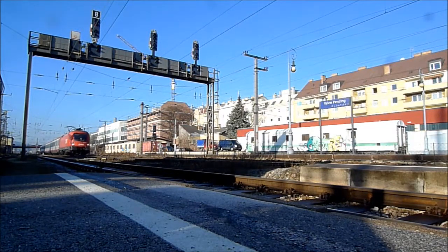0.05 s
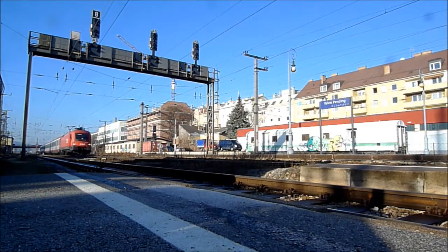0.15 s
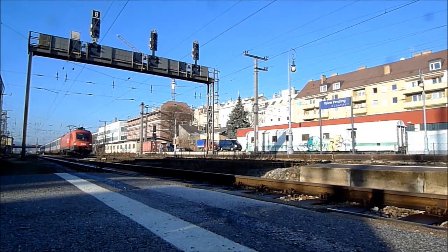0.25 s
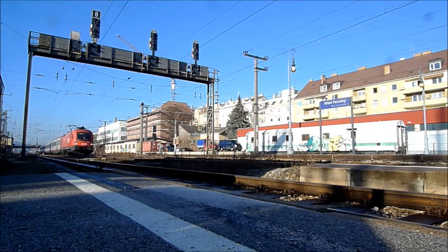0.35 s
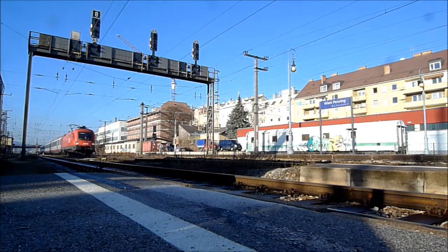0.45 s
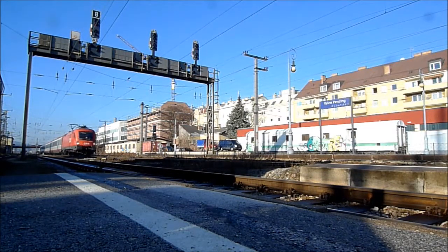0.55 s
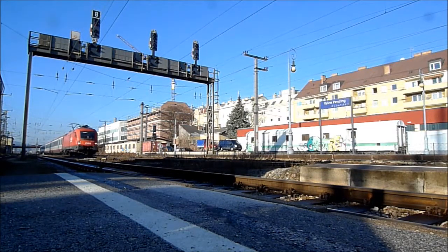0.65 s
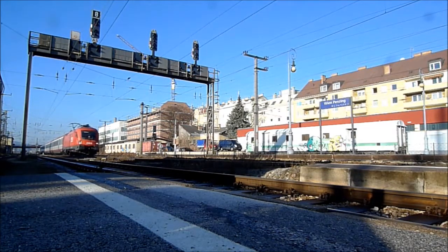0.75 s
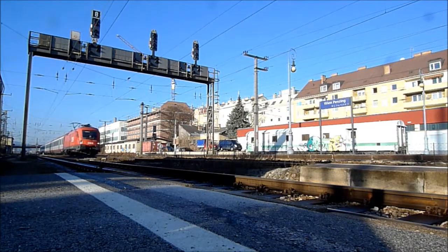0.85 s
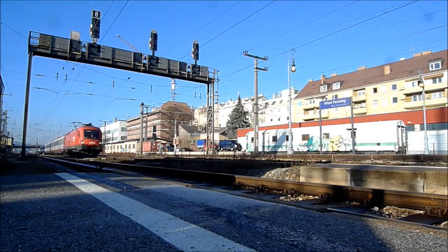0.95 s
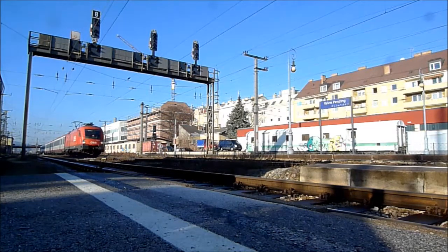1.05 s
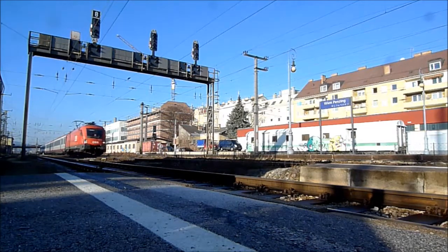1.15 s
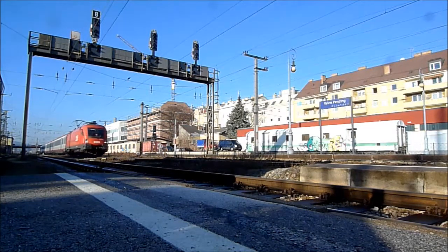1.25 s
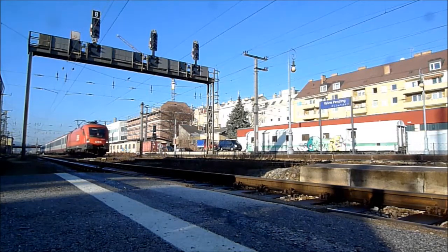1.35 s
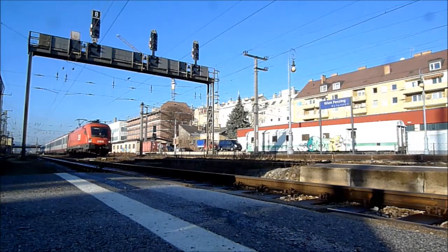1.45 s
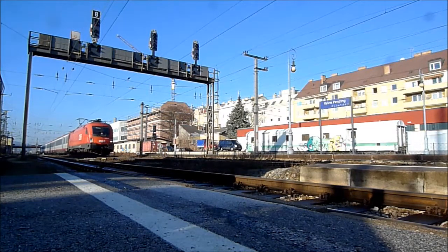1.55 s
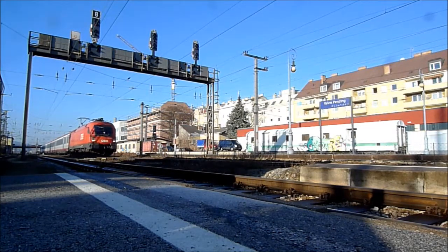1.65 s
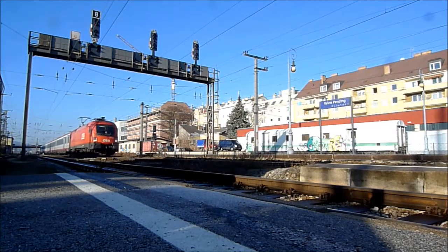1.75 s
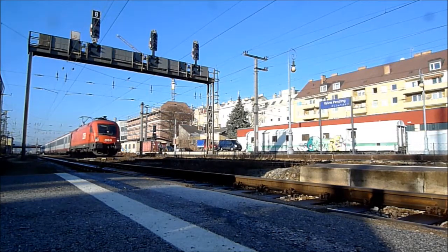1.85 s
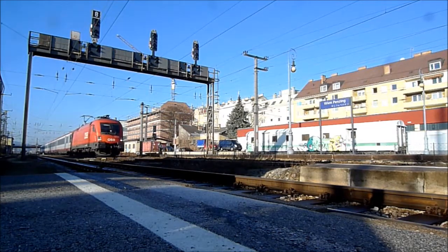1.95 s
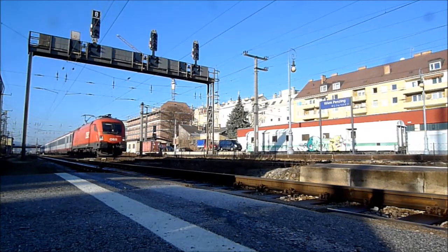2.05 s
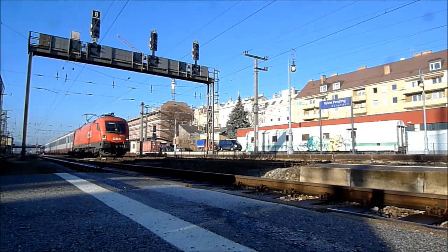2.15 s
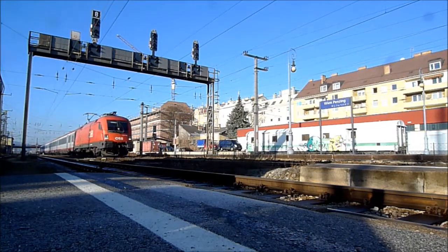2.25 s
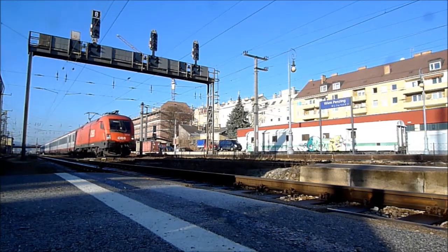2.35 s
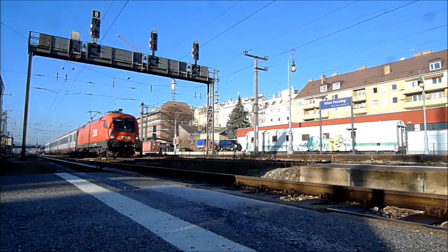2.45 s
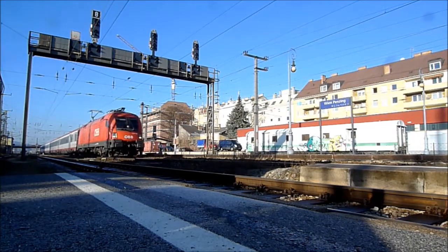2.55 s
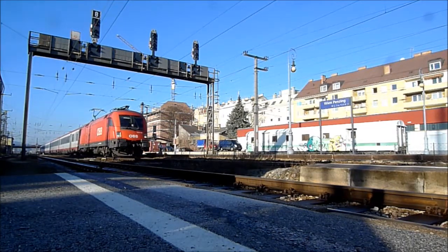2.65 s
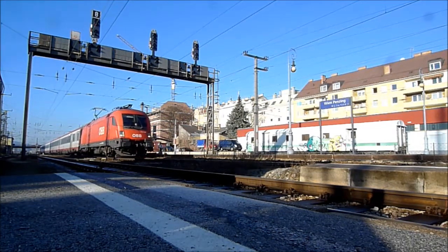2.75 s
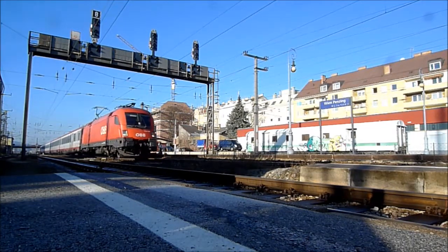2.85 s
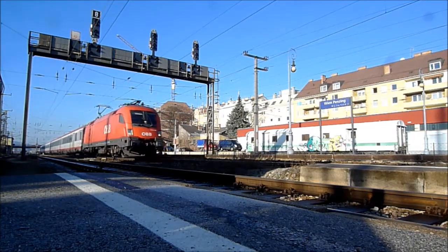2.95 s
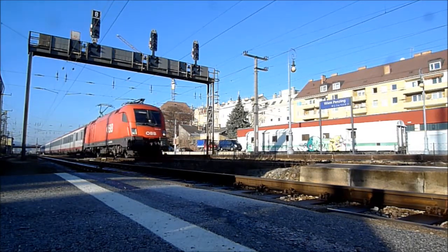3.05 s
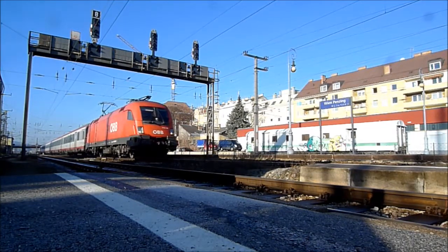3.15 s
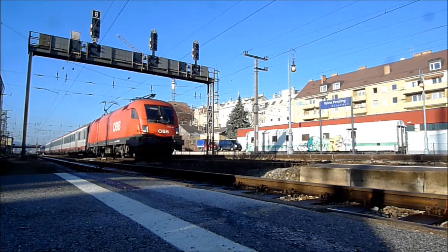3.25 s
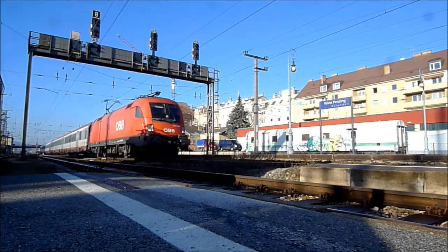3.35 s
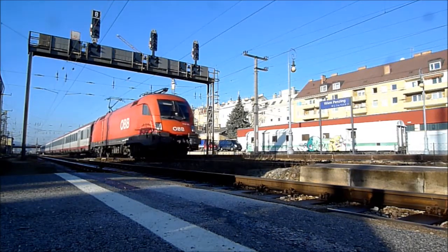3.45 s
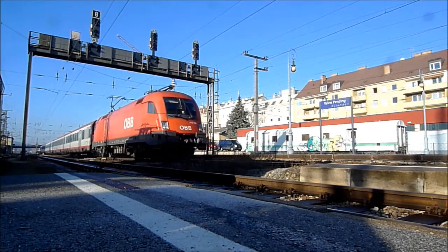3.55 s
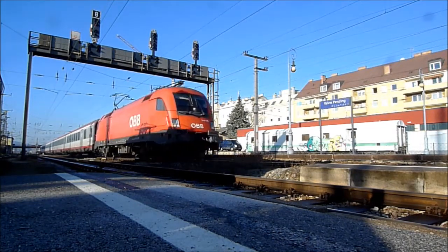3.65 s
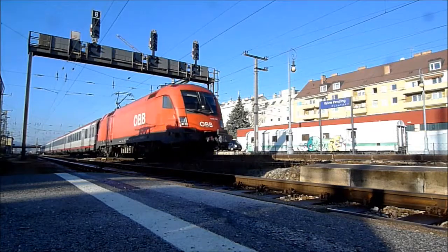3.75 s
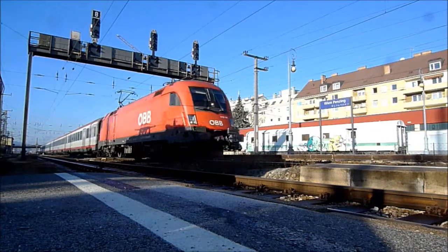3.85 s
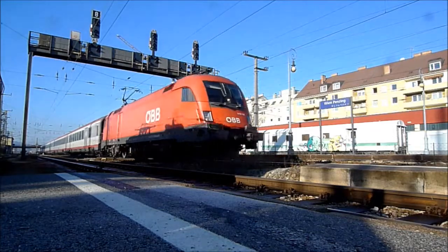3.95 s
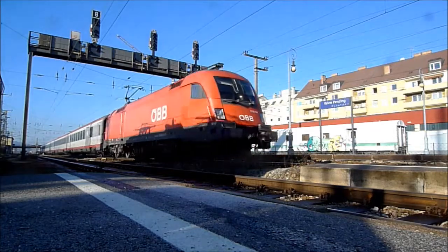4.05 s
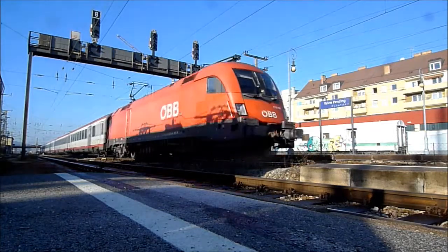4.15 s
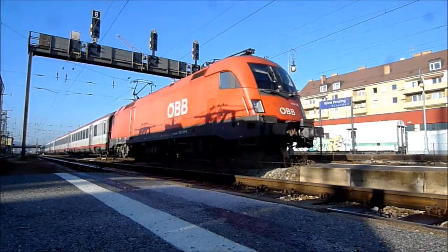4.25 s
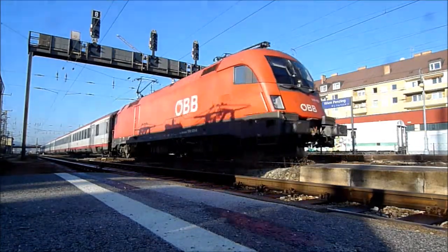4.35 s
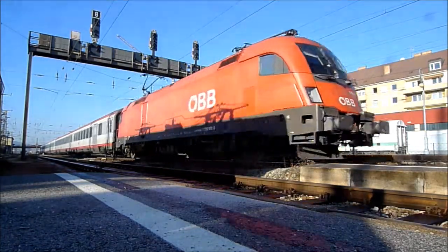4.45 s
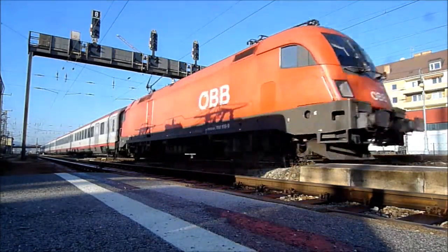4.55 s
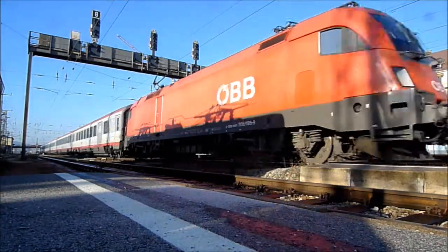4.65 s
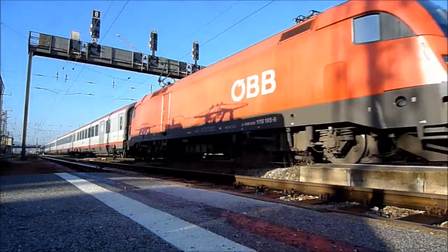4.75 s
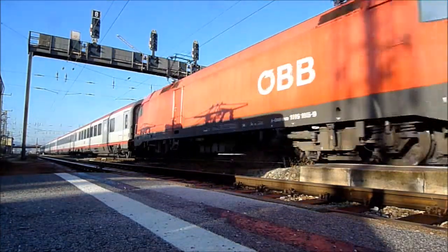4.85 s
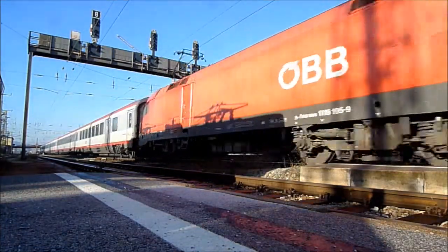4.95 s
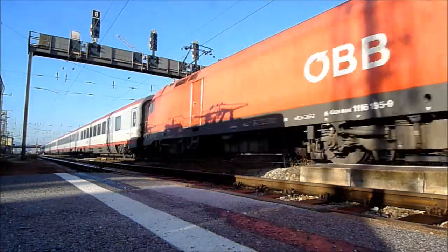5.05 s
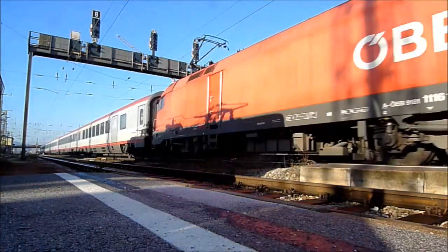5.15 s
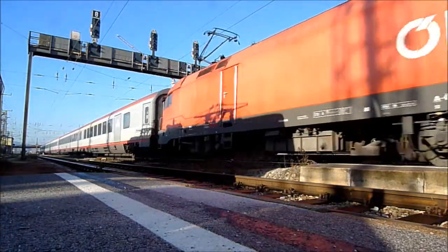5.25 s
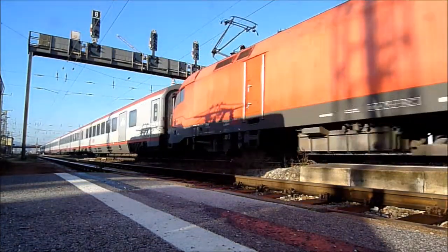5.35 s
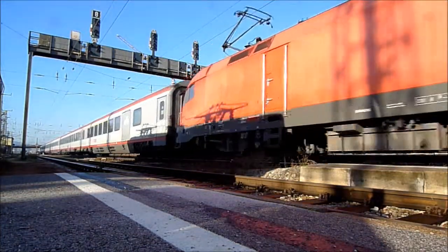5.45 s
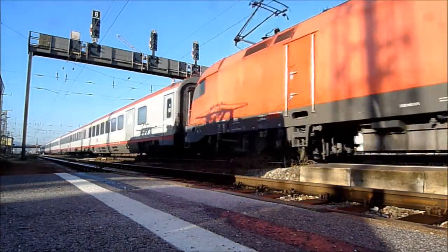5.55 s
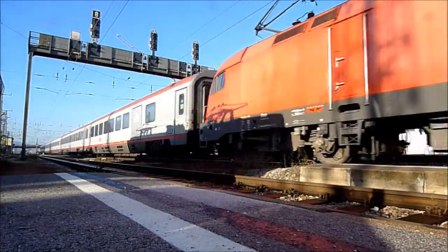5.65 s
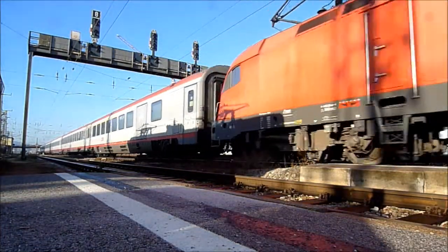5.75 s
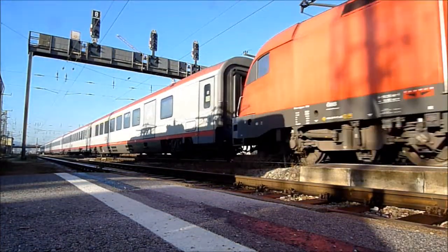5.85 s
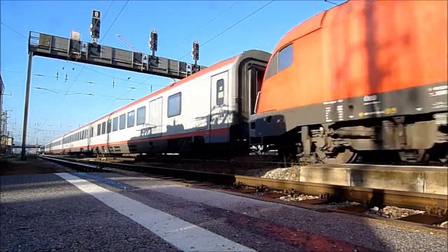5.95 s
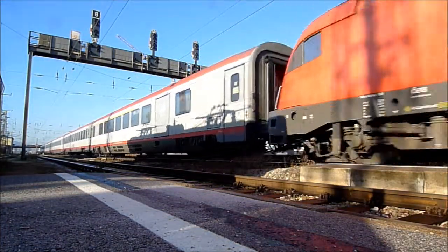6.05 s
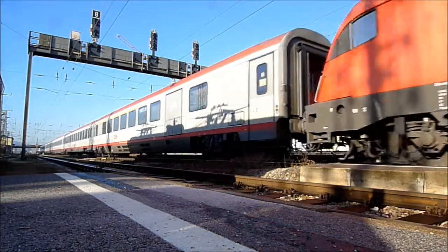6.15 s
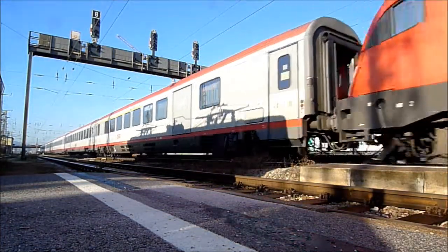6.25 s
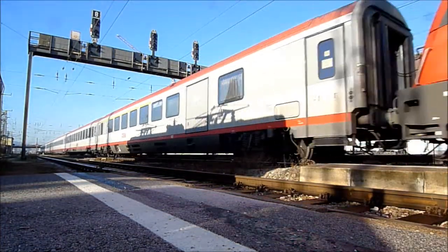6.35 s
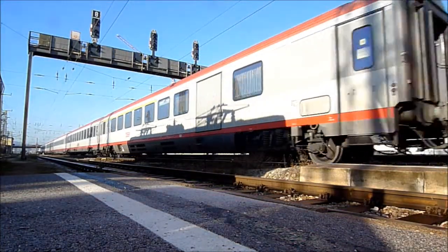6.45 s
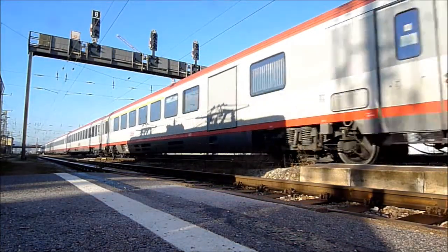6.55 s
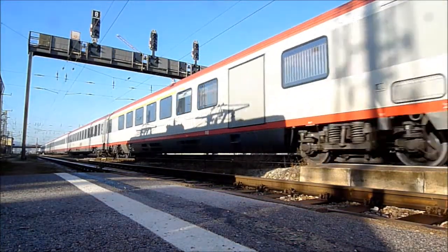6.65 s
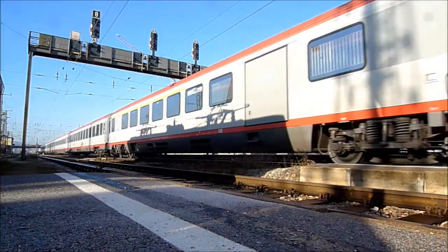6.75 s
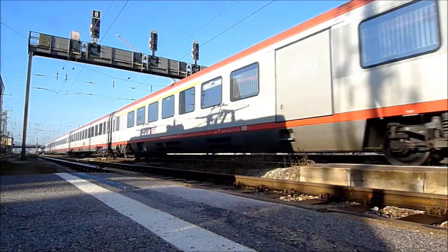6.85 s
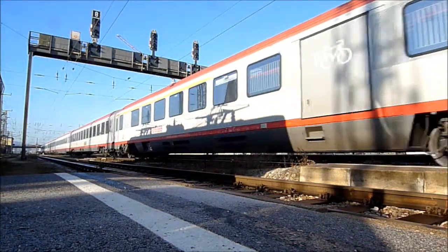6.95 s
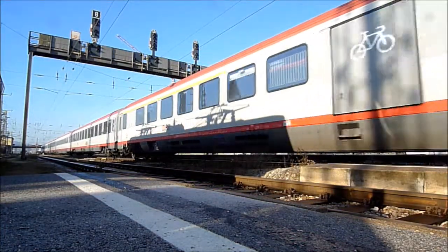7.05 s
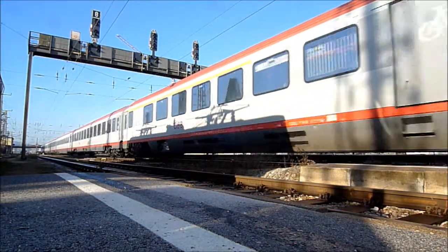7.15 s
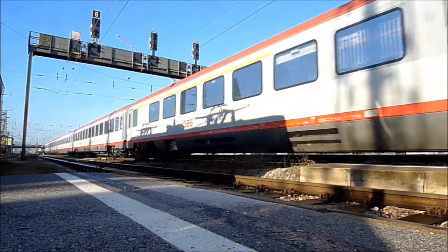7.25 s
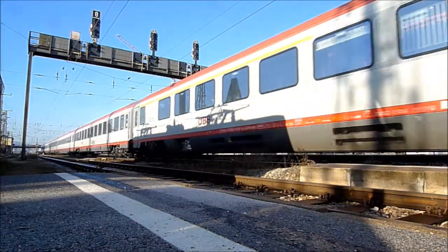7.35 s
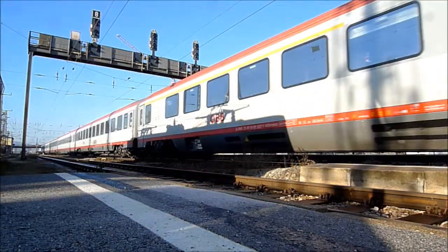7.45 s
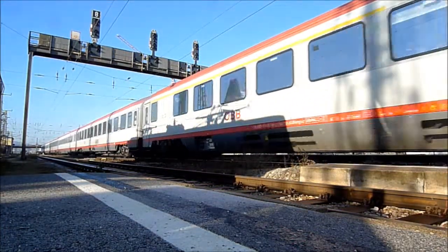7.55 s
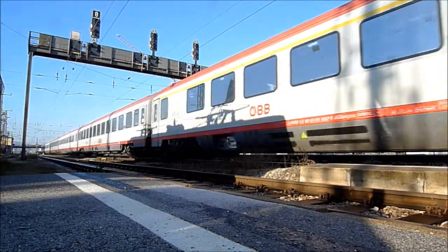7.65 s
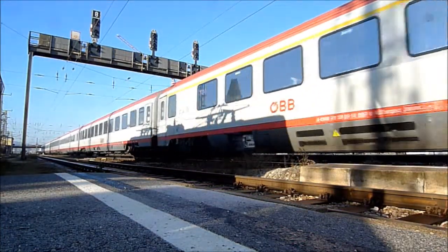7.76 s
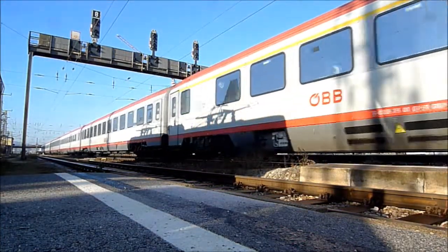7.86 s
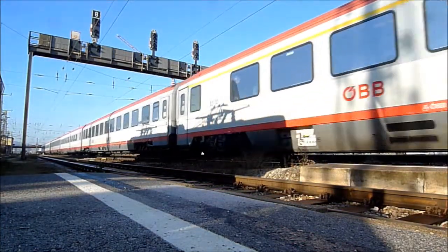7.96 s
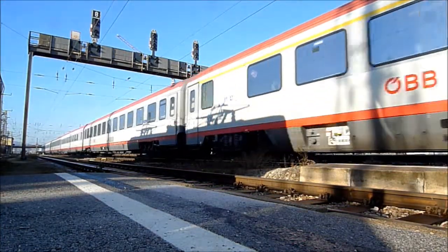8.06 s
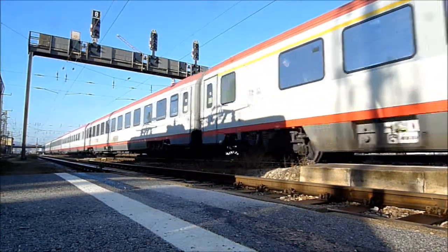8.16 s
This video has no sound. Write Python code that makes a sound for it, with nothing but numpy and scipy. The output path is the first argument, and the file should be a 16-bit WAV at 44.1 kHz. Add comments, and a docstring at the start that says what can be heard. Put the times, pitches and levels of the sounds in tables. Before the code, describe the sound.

Outdoors at a station platform, a fixed microphone close to the track hears a distant rolling rumble with a low electric hum. Small clicks and dull thumps come and go. The locomotive swells into a loud, rough gear whine as it passes, with thin whistles on top. The whine fades, then coaches roll by with ringing wheels and joint thumps, still loud at the end.

```python
"""Rolling noise under a gear whine and a motor hum draws near: an electric locomotive pulls coaches past. The
rolling is one noise in six regions; gears, motors and coach wheels are tones that wander at random. Thin
whistles and lone lines beside the whine's partials are pure tones that switch on and off; wheels thump on rail
joints as damped rings with noise. Small clicks and rattles sound nearby, over a faint hiss and a fainter,
steady high tone."""
import sys
import numpy as np
from scipy import signal
from scipy.fft import rfft, irfft
from scipy.io import wavfile

SR = 44100
rng = np.random.default_rng(int(sys.argv[2]) if len(sys.argv) > 2 else 0)


def gain_from_decibels(decibels):
    """Convert decibel values to linear amplitude factors."""
    exponent = np.asarray(decibels, float) / 20
    return 10 ** exponent


def generate_wav(signal):
    """Clip the signal to [-1, 1] and save it as 16-bit WAV at the path in sys.argv[1]."""
    frames = np.transpose(np.atleast_2d(signal))
    scaled = np.clip(frames, -1, 1) * 32767
    pcm = np.round(scaled).astype(np.int16)
    wavfile.write(sys.argv[1], SR, pcm)


N = 362502
T = np.arange(N) / SR
HZ = np.arange(N // 2 + 1) * SR / N


def in_time(rows):
    """Columns of a curve table at every sample."""
    s, *columns = np.transpose(rows)
    return [np.interp(T, s, c) for c in columns]


def bell(centre_s, length_s):
    """A smooth rise to 1 and fall."""
    return np.exp(-.5 * ((T - centre_s) / length_s) ** 2)


def coloured(points):
    """Spectrum of white noise shaped by (Hz, dB) points."""
    hz, level_db = np.transpose(points)
    shape_db = np.interp(np.log(HZ + 1), np.log(hz), level_db, left=-99, right=-99)
    return rfft(rng.standard_normal(N)) * gain_from_decibels(shape_db)


def band_rms(spectrum, low, high):
    """Rms of the part of a spectrum between two frequencies."""
    inside = spectrum[(HZ > low) & (HZ < high)]
    return np.sqrt(2 * np.sum(np.abs(inside) ** 2)) / N


def drift(rate_hz):
    """Slow chance of spread 1: noise twice through a one-pole low-pass, run in."""
    # worked out at every 32nd sample, then joined up
    r = np.exp(-2 * np.pi * rate_hz * 32 / SR)
    slow = signal.lfilter([1], [1, -2 * r, r * r], rng.standard_normal(N // 32 + 2002))[2000:]
    return np.interp(np.arange(N) / 32, np.arange(len(slow)), slow / slow.std())


def rough_tone(hz, wander_hz, steady):
    """A tone of rms 1: a steady share plus a share whose strength and phase wander."""
    steady = np.clip(steady, 0, 1)
    wander = (drift(wander_hz) + 1j * drift(wander_hz)) * np.sqrt((1 - steady) / 2)
    turning = np.exp(2j * np.pi * np.cumsum(hz * np.ones(N)) / SR)
    return np.sqrt(2) * np.real((np.sqrt(steady) + wander) * turning)


# Rolling noise as the train draws near and its bogies and gaps go by.
# Each row: time in seconds, overall level in dB, brightness in dB per octave.
ROLL_CURVE = [(0.0, -38, 0.5), (0.85, -37.5, 0.5), (1.08, -35.5, -0.5), (2.36, -34.5, 0.0),
              (3.07, -30.5, 0.5), (3.36, -30.5, 0.5), (3.69, -29, 1), (4.51, -23.5, -0.5),
              (4.85, -24, -0.5), (5.54, -24.5, 0), (5.66, -25.5, 1), (6.34, -25, 0), (6.55, -30, 2),
              (6.8, -28, 1), (7.44, -23.5, 0), (7.71, -26, 0), (8.22, -23.5, -0.5)]
# Reference bands of ground, sleepers, car body, rail, wheels and hiss.
# Each row: low edge in Hz, high edge in Hz.
ROLL_BANDS = [(35, 110), (130, 230), (300, 480), (700, 1150), (2300, 3000), (3950, 4500)]
# Spectral shape inside the regions. Each row: frequency in Hz, relative density in dB per Hz.
ROLL_COLOUR = [(13, -27.5), (25, -23.5), (48, -5), (140, 2), (188, 5), (225, 0.5), (330, -6.5), (458, -11),
               (619, -10), (760, -12), (1000, -13), (1840, -12), (2000, -14.5), (2250, -12), (3070, -18.5),
               (3880, -25.5), (4200, -36.5), (5600, -55.5), (7280, -88)]
# How each of those regions moves. Each row: offset from the overall level in dB, share of its swing followed,
# change ahead of the locomotive in dB, change once coaches roll by in dB.
ROLL_REGIONS = [(-12, 0.25, 8.5, -1.5), (-7, 0.27, 1.5, -1.5), (-5.5, 0.79, 3, 1), (-10.5, 0.93, -1, -2.5),
                (-14, 1.33, -2, 0), (-34.5, 0.94, 1.5, 1)]


def rolling():
    """Rough wheels on rough rail: one noise, split in six overlapping regions that swell apart and flutter."""
    noise, out = coloured(ROLL_COLOUR), 0
    centres = np.log([np.sqrt(low * high) for low, high in ROLL_BANDS])
    together = drift(23)
    near_db, bright_db = in_time(ROLL_CURVE)
    mean_db = near_db.mean()
    ahead = bell(3.61, length_s=0.75)
    coaches = np.clip((T - 7.06) / 0.44 + .5, 0, 1)   # change centred on 7.06 s, over 0.44 s
    for k, ((db, follows, ahead_db, coaches_db), (low, high)) in enumerate(zip(ROLL_REGIONS, ROLL_BANDS)):
        # crossfades to its neighbours on a log frequency scale
        region = noise * np.interp(np.log(HZ + 1), centres, np.arange(len(centres)) == k)
        octaves = (centres[k] - centres.mean()) / np.log(2)
        level_db = db + mean_db + follows * (near_db - mean_db) + octaves * bright_db
        level_db = level_db + ahead_db * ahead + coaches_db * coaches
        flutter_db = 0.49 * together + 0.96 * drift(8.1)
        out = out + gain_from_decibels(level_db + flutter_db) * irfft(region, N) / band_rms(noise, low, high)
    return out


# Gear and hum lines swell or sink for a while.
# Each row: centre in seconds, name of the line, change in dB, length (bell spread) in seconds.
SWELLS = [(3.7, "hum 1", 2, 0.26), (4.17, "hum 1", 7.5, 0.24), (4.63, "hum 1", -4.5, 0.31),
          (5.52, "hum 1", -1, 0.17), (5.85, "hum 1", 3.5, 0.1), (6.27, "hum 1", -3, 0.22),
          (0.97, "hum 2", 5, 0.44), (2.65, "hum 2", 4.5, 0.063), (3.2, "hum 2", 5.5, 0.13),
          (3.736, "hum 2", -17, 0.067), (4.95, "hum 2", 5, 0.13), (8.2, "hum 2", 3, 0.3),
          (7.9, "hum 2", -3, 0.19), (7.7, "hum 2", 2.5, 0.26), (6.7, "hum 2", -1.5, 0.27),
          (0.85, "gear 1", -2, 0.36), (1.6, "gear 1", 1, 0.2), (5.01, "gear 1", -3, 0.15),
          (2.83, "gear 1", 3, 0.079), (5.44, "gear 1", 4.5, 0.17), (5.97, "gear 1", -4.5, 0.17),
          (6.34, "gear 1", 5.5, 0.18), (3.5, "gear 1", 4.5, 0.11), (7.05, "gear 1", -8, 0.26),
          (7.38, "gear 1", 13, 0.19), (4.58, "gear 2", 4, 0.3), (8.5, "gear 2", 0, 0.1),
          (5.01, "gear 2", 9, 0.12), (1.8, "gear 2", 1, 0.94), (3.3, "gear 2", 0.5, 0.33),
          (6.6, "gear 2", 0, 0.23), (7.04, "gear 2", 7.5, 0.16), (4.8, "gear 3", 3, 0.089),
          (5.8, "gear 3", 2, 0.12), (8.7, "gear 3", 5.5, 0.12), (7.0, "gear 3", 13, 0.52),
          (5.7, "gear 5", -2, .3), (5.8, "gear 5", -3, .6), (2.0, "gear 6", 5, 0.25)]


def passing(line, closest_s, closest_db, coming, going):
    """Level in dB of a line that draws near and leaves as powers of distance, with its swells."""
    pass_s = 0.95   # closest distance over speed
    apart_db = 10 * np.log10(1 + ((T - closest_s) / pass_s) ** 2)
    swells_db = sum(db * bell(s, length_s) for s, name, db, length_s in SWELLS if name == line)
    return closest_db - np.where(T < closest_s, coming, going) * apart_db + swells_db


# Gear mesh pitch, rising and sinking as the drives go by. Each row: time in seconds, pitch in Hz.
GEAR_PITCH = [(0, 607), (1.2, 611.4), (2.1, 613), (2.9, 613.2), (3.5, 611), (4.1, 620), (4.6, 620.6),
              (5.15, 621.7), (5.5, 614), (6.0, 606.5), (6.5, 600.3), (6.9, 616), (7.4, 612), (8.22, 623)]
# Make-up of the whine. Each row: harmonic number, wander rate of its centre tone in Hz, steady share of it,
# lower sideband in dB, upper sideband in dB, both against the centre tone.
GEAR_HARMONICS = [(1.0, 13.8, 0.35, -15, -23), (2.0, 17, 0.52, -10, -15), (3.0, 14, 0.13, -2, 0.5),
                  (4.0, 22, 0.05, 3.5, -7), (5.0, 28, 0.11, -12, -11.5), (6.0, 13, 0.05, -6.5, 4.5)]
# How each harmonic passes. Each row: closest moment in seconds, centre level there in dB before swells,
# power of distance lost coming, power lost going.
GEAR_PASS = [(5.64, -23.5, 1.12, 2.11), (5.66, -31.5, 1.32, 2.33), (5.22, -41, 1.56, 2.3),
             (5.2, -47.5, 5.9, 1.3), (4.7, -47, 1.6, 3.5), (3, -61.5, 1.3, 0.39)]


def gears(shaft_hz):
    """Several drives beat against each other: narrow rough bands, with sidebands one shaft turn away."""
    hz, = in_time(GEAR_PITCH)
    out = 0
    for (k, wander_hz, steady, low_db, high_db), path in zip(GEAR_HARMONICS, GEAR_PASS):
        centre_hz = round(k) * hz
        tone = rough_tone(centre_hz, wander_hz, steady)
        lower = gain_from_decibels(low_db) * rough_tone(centre_hz - shaft_hz, 0.99 * wander_hz, steady=0)
        upper = gain_from_decibels(high_db) * rough_tone(centre_hz + shaft_hz, 0.99 * wander_hz, steady=0)
        out = out + gain_from_decibels(passing("gear " + str(round(k)), *path)) * (tone + lower + upper)
    return out


# The rear drive comes abreast later, pitched high at first. Each row: time in seconds, mesh pitch in Hz.
REAR_PITCH = [(5.3, 634.3), (5.9, 631.3), (6.5, 613)]
# Harmonics 1 to 3 of the rear drive. Each entry: level at the closest moment in dB rms.
REAR_LEVELS = [-36.5, -33, -39.5]


def rear_gears():
    """The same kind of mesh tone from the second bogie, heard only while it passes."""
    hz, = in_time(REAR_PITCH)
    tones = sum(gain_from_decibels(db) * rough_tone((k + 1) * hz, wander_hz=15, steady=.2)
                for k, db in enumerate(REAR_LEVELS))
    return bell(5.99, length_s=0.34) * tones


# How the hum and then its octave pass. Each row: closest moment in seconds, level there in dB before swells,
# power of distance lost coming, power lost going.
MOTOR_PASS = [(5.48, -26, 1.25, 0.87), (4.18, -27, 1.57, 0.93)]
# The octave sags as the motors leave, then recovers. Each row: time in seconds, pitch factor.
OCTAVE_SAG = [(5.1, 1.0), (5.6, .99), (6.1, .98), (6.45, .955), (6.7, 1.0)]


def motors(hz):
    """The hum of the traction motors and its octave, each partly steady and partly wandering."""
    sag, = in_time(OCTAVE_SAG)
    hum = gain_from_decibels(passing("hum 1", *MOTOR_PASS[0])) * rough_tone(hz, 15.0, steady=0.33)
    octave = gain_from_decibels(passing("hum 2", *MOTOR_PASS[1])) * rough_tone(2 * hz * sag, 14.3, steady=0.26)
    return hum + octave


# Wheel modes of a coach bogie. Each entry: ringing pitch in Hz before the Doppler shift.
WHEEL_MODES = [1370, 1575, 1880, 2165, 2230, 2725, 2910, 3300, 3365, 3750, 3940, 4635, 5410]
# How each of those modes rings. Each row: wander rate in Hz, level against its group in dB,
# loudest moment of its pass in seconds.
WHEEL_RINGING = [(20, -1, 7.3), (45, 5.5, 7.37), (25.2, -6, 7.3), (22, 3.5, 6.8), (25, 4, 7.4),
                 (35, -1, 7.4), (30, -2.5, 7.3), (22, -0.5, 7.3), (22, -1.5, 7.15), (25, -11.5, 7.25),
                 (30, -12.5, 7.4), (35, -0.5, 7.4), (40, -17, 7.2)]
# Doppler shift of the bogie. Each row: time in seconds, pitch factor.
BOGIE_DOPPLER = [(6.8, 1.01), (7.6, .992)]


def bogie():
    """Rail roughness keeps every wheel mode ringing at random; the pitch sinks as the bogie goes by."""
    doppler, = in_time(BOGIE_DOPPLER)
    pass_s = 0.53   # closest distance over speed
    top_db = -63.5 + 6 * bell(7.38, length_s=0.04)   # the modes above 4 kHz flare once in a squeak
    modes = 0
    for hz, (wander_hz, db, loudest_s) in zip(WHEEL_MODES, WHEEL_RINGING):
        group_db = top_db if hz > 4000 else -41
        apart_db = 10 * np.log10(1 + ((T - loudest_s) / pass_s) ** 2)
        level_db = db + group_db + 2.7 * drift(5.0) - apart_db
        modes = modes + gain_from_decibels(level_db) * rough_tone(hz * doppler, wander_hz, steady=0)
    arrive = np.clip((T - 6.46) / 0.64, 0, 1)
    leave_db = -42 * np.maximum(T - 7.69, 0)   # 42 dB per second
    return arrive * gain_from_decibels(leave_db) * modes


# Steady pure tones: thin whistles high up, and lone lines beside the gear whine's partials that sound for a
# while. # Each row: start in seconds, end in seconds, pitch in Hz, full level in dB rms.
STEADY_TONES = [(.75, 1.75, 3512, -67), (1.73, 2.3, 3512, -54), (2.25, 3.3, 3505, -62), (2.55, 3.9, 3725, -60),
                (4.3, 5.5, 3755, -57), (4.5, 5.15, 1905, -42), (1.1, 1.75, 3730, -66), (7.75, 8.3, 1242, -44),
                (1.73, 2.6, 3730, -58), (1.95, 3.5, 3925, -63), (2.26, 2.55, 3090, -54), (3.15, 3.7, 3090, -54),
                (6.0, 6.7, 1385, -43), (4.35, 5.0, 2805, -50), (4.3, 4.9, 2170, -47), (4.95, 5.06, 2430, -40),
                (4.3, 5.55, 2410, -47), (0, 1.1, 3760, -65), (.7, 1.1, 3945, -67), (4.2, 4.75, 362, -37),
                (5.2, 6.1, 3320, -53), (5.75, 6.2, 2260, -46), (7.75, 8.3, 3480, -54), (7.8, 8.3, 2250, -46)]


def steady_tones():
    """Pure tones: each comes in quickly and fades out more slowly."""
    out = 0
    for start_s, end_s, hz, db in STEADY_TONES:
        envelope = np.clip(np.minimum((T - start_s) / 0.012, (end_s - T) / 0.068), 0, 1)
        out = out + gain_from_decibels(db) * envelope * rough_tone(hz, 16.0, steady=1.0)   # steady 1 leaves no wander
    return out


def struck(s, start_db, hz, t60_s, crack, rise_s):
    """A damped ring with a share of noise, dull above the ring's pitch, that dies with it."""
    t = np.arange(SR // 4) / SR
    dull = signal.lfilter(*signal.butter(2, 1.45 * hz, fs=SR), rng.standard_normal(len(t)))
    # a lower pitch leaves less noise, so it is made up
    body = np.sin(2 * np.pi * hz * t) + crack * dull * np.sqrt(SR / (4 * hz))
    out, at = np.zeros(N + len(t)), round(s * SR)
    out[at:at + len(t)] = gain_from_decibels(start_db - 60 * t / t60_s) * np.minimum(t / rise_s, 1) * body
    return out[:N]


def band_pass(x, order, low_hz, high_hz):
    """Keeps a band; the tiny offset spares the filter vanishing numbers."""
    return signal.sosfilt(signal.butter(order, [low_hz, high_hz], "band", fs=SR, output="sos"), x + 1e-18)


# Wheels on rail joints. Each row: start in seconds, starting level in dB before filtering, pitch in Hz.
THUMPS = [(1.092, -20.5, 231), (1.921, -21, 239.6), (2.429, -16.5, 171.2), (2.968, -15.5, 298),
          (4.033, -25, 264), (4.797, -11, 187), (7.388, -17.5, 263), (7.662, -10.5, 257), (7.943, -20, 300),
          (7.05, -18, 260.6), (8.071, -22, 220)]


def thumps():
    """Dull blows, half ring and half noise, that die away in a tenth of a second."""
    hits = sum(struck(s, db, hz, t60_s=0.1, crack=0.71, rise_s=.006) for s, db, hz in THUMPS)
    return band_pass(hits, 2, 110, 600)


# Small clicks nearby. Each row: start in seconds, starting level in dB before filtering, pitch in Hz,
# time to fall 60 dB in seconds.
CLICKS = [(0.0644, -24.5, 2316, 0.012), (0.49, -17.5, 2170, 0.0092), (0.496, -24, 2024, 0.0086),
          (1.1534, -32, 2130, 0.016), (1.159, -26, 1200, 0.013), (1.1646, -32, 1204, 0.02),
          (1.469, -31.5, 2230, 0.018), (1.958, -26, 2190, 0.014), (2.78, -24, 2680, 0.023),
          (2.9701, -22, 4300, .012), (2.975, -32, 1500, 0.018), (2.985, -28, 4308, 0.023),
          (3.115, -26.5, 2760, 0.032), (3.3, -29, 4432, 0.017), (4.04, -10.5, 1800, 0.014),
          (4.048, -19, 1410, 0.015), (4.058, -14, 1610, 0.013), (4.0668, -11.5, 2255, 0.023),
          (4.072, -22, 2350, 0.012), (4.0789, -12, 2520, 0.014), (4.086, -17, 3700, 0.012),
          (4.0912, -19, 2280, 0.025)]


def clicks():
    """Short rings, each with a lower body note at 750 Hz that dies as fast."""
    out = 0
    for s, db, hz, t60_s in CLICKS:
        out = out + struck(s, db, hz, t60_s, crack=0.98, rise_s=.0009)
        out = out + struck(s, db - 8, 750, t60_s, crack=0.95, rise_s=.0009)
    return band_pass(out, 1, 500, 3300)


# Something loose rattles. Each row: start in seconds, end in seconds, full level in dB rms, centre in Hz.
# A row that ends before it starts is silent.
RATTLES = [(1.152, 1.172, -32, 1200), (3.78, 3.65, -29, 1270), (4.8, 4.83, -28, 600),
           (4.02, 4.03, -32, 2000)]


def rattles():
    """Dense tiny impacts of uneven size over a bed of noise, heard through a broad band."""
    per_s, reach = 2000, 2 ** 0.8   # reach: 0.8 octave either side
    impacts = (rng.random(N) < per_s / SR) * np.sqrt(SR / per_s)
    grains = rng.standard_normal(N) * (.25 + impacts)
    out = 0
    for start_s, end_s, db, hz in RATTLES:
        band = band_pass(grains, 2, hz / reach, min(hz * reach, 3800))
        envelope = np.clip(np.minimum(T - start_s, end_s - T) / 0.0071, 0, 1)
        out = out + gain_from_decibels(db) * envelope * band / band.std()
    return out


def knocks():
    """Thumps, clicks and rattles, with next to nothing left above 5.6 kHz."""
    dull = signal.cheby2(8, 60, 5600, fs=SR, output="sos")
    return signal.sosfilt(dull, clicks() + thumps() + rattles())


# Motor hum, six times the shaft speed; the train gathers speed. Each row: time in seconds, pitch in Hz.
MOTOR_PITCH = [(0, 249), (3.3, 268), (4.0, 275.2), (4.9, 274), (5.7, 272), (6.4, 272.3), (8.22, 276)]


def scene():
    """Everything reaches one microphone."""
    hum_hz, = in_time(MOTOR_PITCH)
    drive = gears(hum_hz / 6) + rear_gears() + motors(hum_hz)
    return (rolling() + drive + steady_tones() + bogie() + knocks())[None, :]


# Spectral shape of the amplifier's hiss. Each row: frequency in Hz, relative density in dB per Hz.
HISS_COLOUR = [(2650, -15.5), (4500, 5.5), (5370, 6.5), (6920, 7.5), (7530, 6), (7950, -7), (10300, -50),
               (17500, -120)]


def amplifier_hiss():
    """Shaped noise at -70 dB rms between 5.5 and 7.5 kHz."""
    spectrum = coloured(HISS_COLOUR)
    return gain_from_decibels(-70) * irfft(spectrum, N) / band_rms(spectrum, 5500, 7500)


def electronic_tone():
    """A faint steady sine at 6666 Hz, -86 dB rms."""
    return gain_from_decibels(-86) * np.sqrt(2) * np.sin(2 * np.pi * 6666 * T)


def band_limit(x):
    """A steep low-pass at the top of the band."""
    return signal.sosfilt(signal.butter(12, 8100, fs=SR, output="sos"), x)


def record(dry):
    """Adds the amplifier's hiss, a faint electronic tone and a small offset; both ends fade over 3 ms."""
    offset = -.0078
    fade = np.sin(np.pi / 2 * np.clip(np.minimum(T, T[-1] - T) / .003, 0, 1)) ** 2
    mix = fade * (dry + amplifier_hiss() + electronic_tone() + offset)
    return band_limit(mix)


dry = scene()
out = record(dry)
generate_wav(out)
```